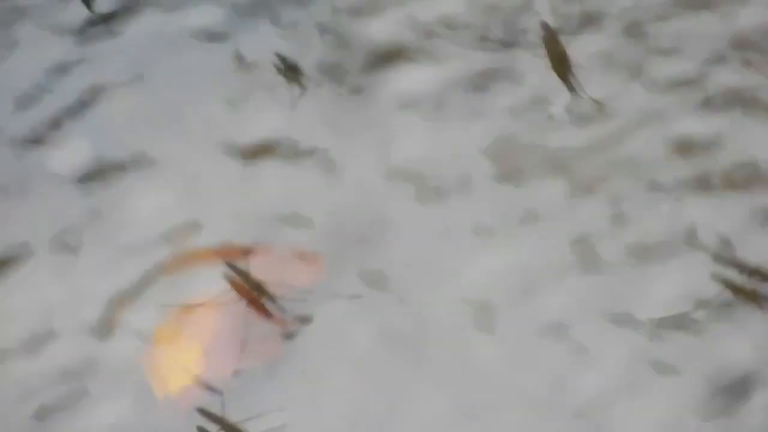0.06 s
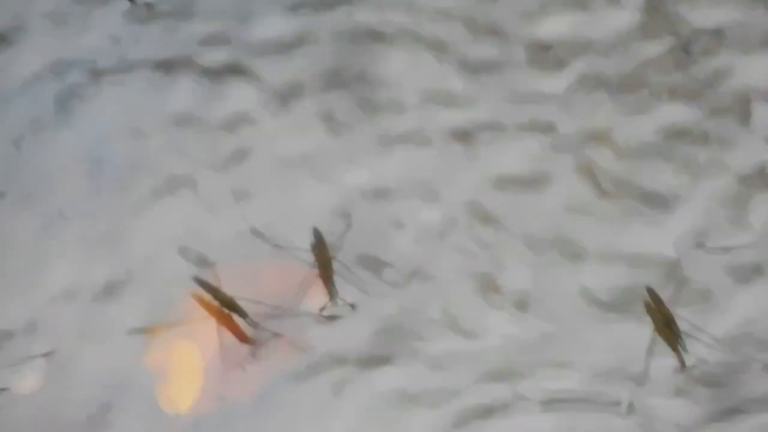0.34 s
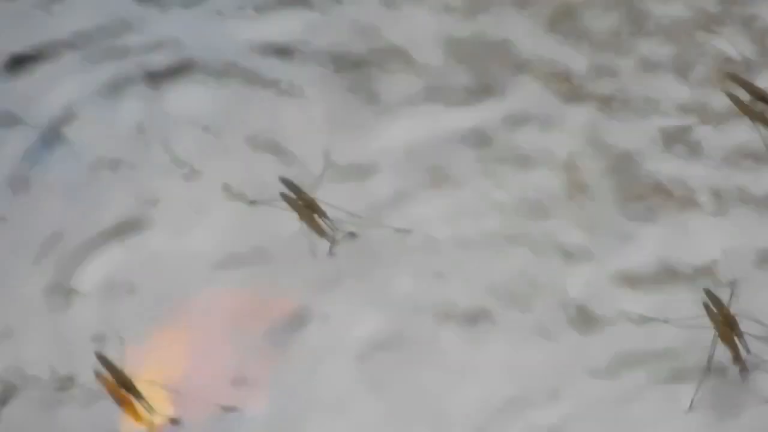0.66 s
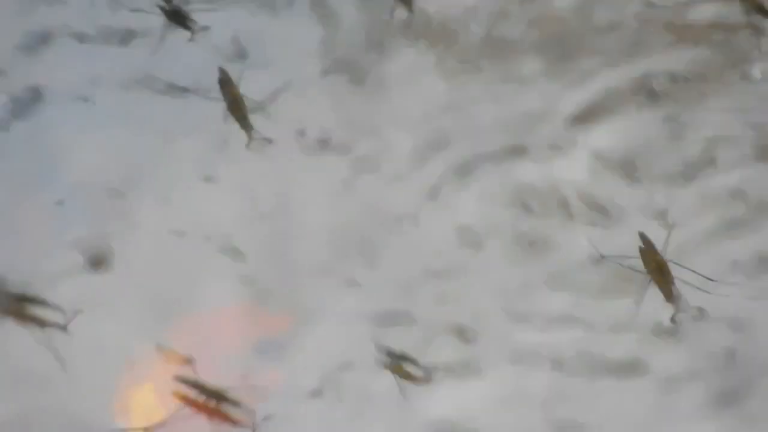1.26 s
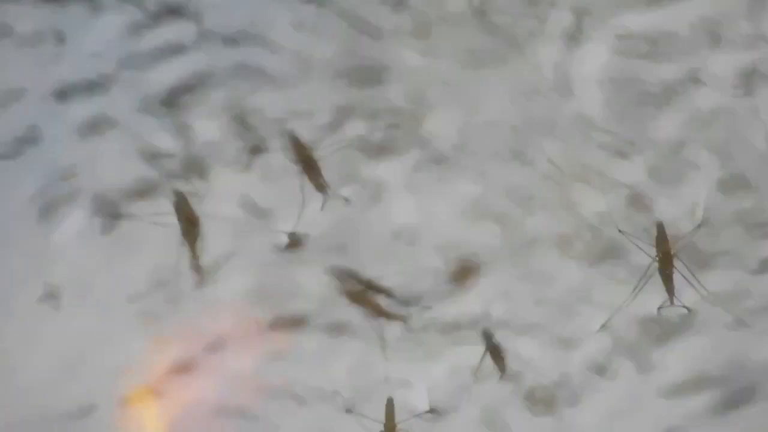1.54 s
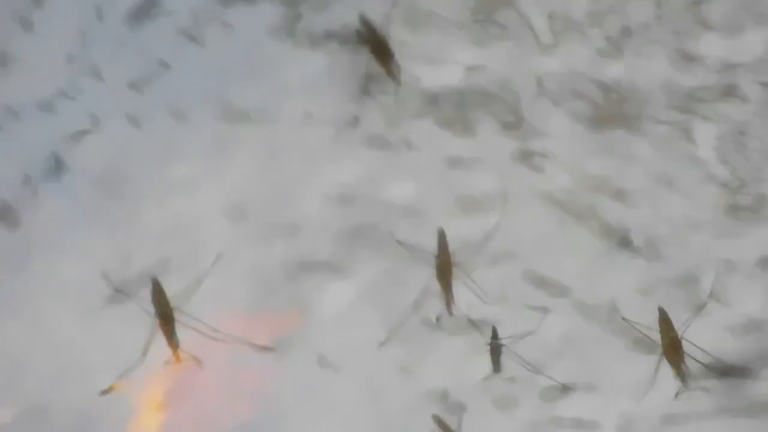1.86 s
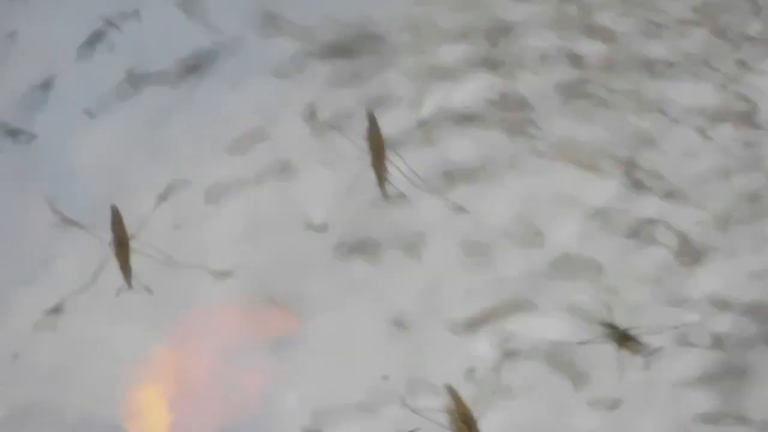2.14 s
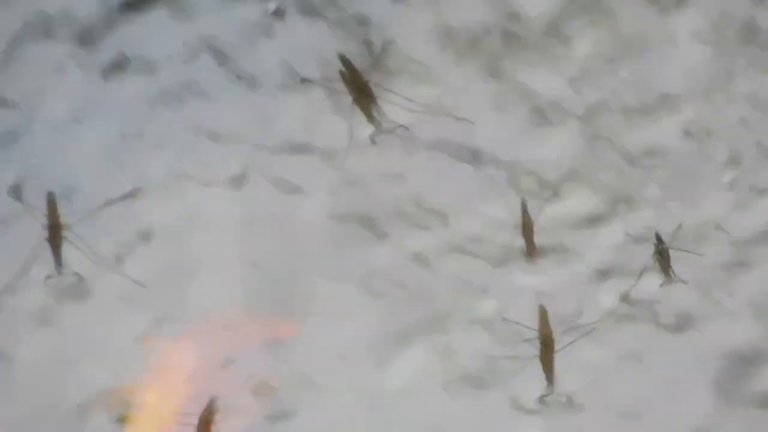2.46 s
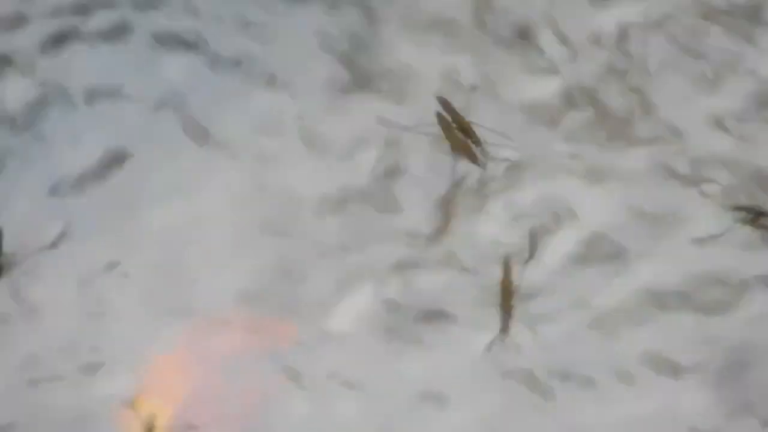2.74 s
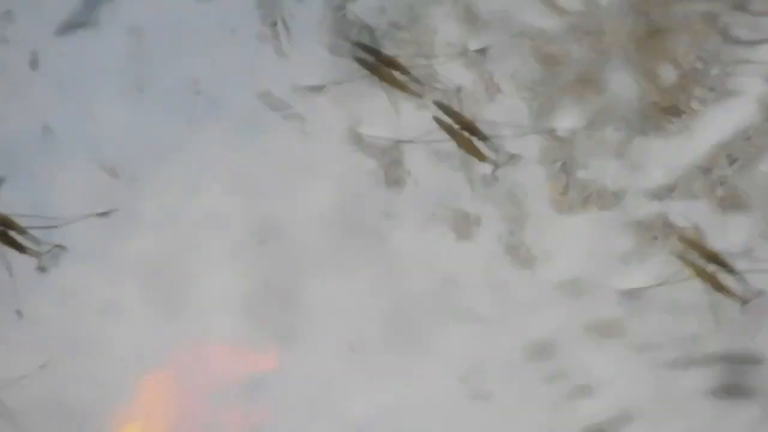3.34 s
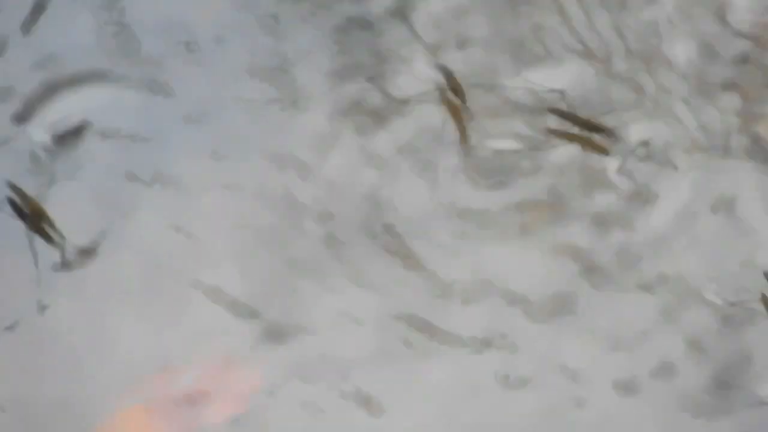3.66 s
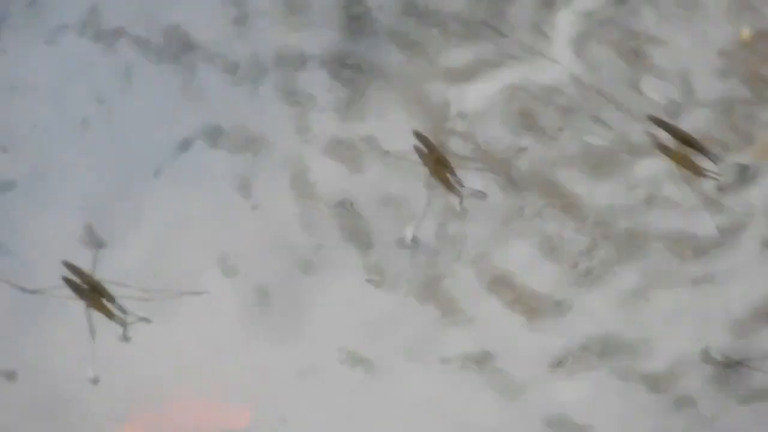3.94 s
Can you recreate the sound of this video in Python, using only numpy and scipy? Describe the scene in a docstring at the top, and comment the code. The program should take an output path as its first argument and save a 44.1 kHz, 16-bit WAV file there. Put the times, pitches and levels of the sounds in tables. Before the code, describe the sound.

A light breeze hisses through leaves beside a pond, swelling a little and then easing. Faint ticks and very brief distant chirps dot the middle, while air softly bumps the microphone, mostly at the start and end.

```python
"""Breeze beside a pond

A breeze swells and eases in the leaves, whose countless contacts add up to an even hiss with a
fine rustle in it. A few faint ticks, as of twigs or drops, stand out, with brief distant chirps.
Air nudges the microphone with soft bumps and a low flutter, and a steady far wash lies beneath.
Both channels carry the same sound."""
import sys
import numpy as np
from scipy import signal
from scipy.io import wavfile

SR = 44100
rng = np.random.default_rng(int(sys.argv[2]) if len(sys.argv) > 2 else 0)


def generate_wav(sig):
    """Save sig (samples, or channels by samples) to the path in sys.argv[1] as 16-bit PCM at SR."""
    pcm = np.round(np.clip(np.atleast_2d(sig).T, -1, 1) * 32767).astype(np.int16)
    wavfile.write(sys.argv[1], SR, pcm)


N = 176400
TIME = np.arange(N) / SR

# Strength of the breeze, heard in the leaves. Each row: time in seconds, level in dB.
BREEZE_LEVEL = [(0, -54), (.35, -54), (.8, -52), (1.25, -50.1), (1.5, -49.5), (1.83, -51), (1.95, -49.5),
                (2.15, -51), (2.8, -52), (3.4, -54), (4, -53.5)]
# Spectrum of the leaves. Each row: frequency in Hz, relative spectral density in dB.
LEAF_SPECTRUM = [(100, -43), (250, -11.5), (500, -7), (800, -1), (1100, -3), (1350, 0.5), (1700, 1),
                 (2400, 2), (3800, -2.5), (5600, -6.5), (7600, -14.5), (10500, -15), (13000, -24),
                 (15500, -27)]
# Small ticks. Each row: start in seconds, level in dB, centre in Hz, bandwidth in octaves,
# time to decay by 60 dB in seconds, tail level in dB relative to the crack.
TICK_EVENTS = [(.56, -57, 12500, 0.56, 0.064, -9.5), (1.205, -45, 3900, 0.69, 0.13, -9.5),
               (1.722, -29.5, 2600, 0.5, 0.0071, -18), (1.994, -44, 4500, 2.3, 0.053, -9.5),
               (2.5825, -49, 9300, .4, .012, -10), (2.5922, -34, 3750, 0.95, 0.013, -12),
               (2.9, -57, 10900, .6, 0.2, -9.5), (3.192, -38, 3000, 1.5, 0.018, -14),
               (3.4516, -31, 14200, .3, 0.003, -21), (3.4526, -37.5, 3300, 1.7, 0.0061, -7),
               (3.453, -44.5, 3700, .15, 0.065, -9)]
# Chirps, as of far birds or drips. Each row: midpoint in seconds, level in dB,
# pitch at the midpoint in Hz, glide in Hz per second, length in seconds.
CHIRP_EVENTS = [(1.633, -52.5, 1470, 3500, 0.092), (2.762, -50.5, 1380, 0, 0.039),
                (2.832, -55, 1330, 0, .045), (3.197, -49, 2104, -62000, .035)]
# Nudges of air on the microphone. Each row: midpoint in seconds, peak in dB, pitch in Hz,
# Gaussian width in cycles.
BUMP_EVENTS = [(0.0226, -43, 90, 0.13), (.0685, -50, 90, .3), (0.0864, -45, 150, 0.13),
               (0.0919, -44.5, 280, 0.23), (0.1008, -45, 149, 0.24), (0.108, -43, 260, 0.41),
               (0.2823, -42, 140, 0.15), (0.2859, -38.5, 283, 0.18), (0.3379, -54, 322, 0.5),
               (0.346, -56, 220, 0.31), (1.607, -59, 85, 0.52), (1.68, -59, 60, 0.61),
               (1.928, -48.5, 149, 0.28), (2.05, -61, 160, 0.29), (2.303, -48, 350, 0.69),
               (2.3123, -49, 193, 0.42), (2.4045, -46.5, 250, 0.44), (2.4355, -44.5, 310, 0.33),
               (2.443, -48, 120, .3), (2.474, -48.5, 248, 0.31), (2.547, -51, 190, 0.39),
               (3.41, -60, 64.7, .5), (3.794, -32, 475, 0.49), (3.8225, -45, 79, 0.2),
               (3.8402, -41.5, 215, 0.24), (3.873, -42.5, 260, 0.22), (3.9953, -33, 320, 0.24)]
# Strength of the air's flutter on the microphone. Each row: time in seconds, level in dB.
FLUTTER_LEVEL = [(0, -44), (.045, -64), (.095, -53.5), (.15, -70), (.25, -61), (.4, -68), (.7, -86),
                 (1.0, -82), (1.35, -74), (1.75, -71), (1.92, -68), (2.07, -65), (2.18, -71), (2.47, -60.5),
                 (2.8, -77), (3.2, -88), (3.4, -74), (3.55, -74), (3.76, -61), (3.84, -58), (4, -59)]
# Spectrum of the flutter. Each row: frequency in Hz, relative spectral density in dB.
FLUTTER_SPECTRUM = [(20, -0.5), (40, 0.5), (80, -2.5), (160, -6.5), (350, -14), (600, -34), (1200, -71)]
# Spectrum of the far wash. Each row: frequency in Hz, relative spectral density in dB.
WASH_SPECTRUM = [(30, -6.5), (120, -14), (300, -6), (600, 1), (900, 1), (1140, 3), (1400, 2), (1800, -4),
                 (3000, -16), (6000, -5.5), (8000, -15.5), (15500, -19.5)]


def leaves(hiss_db=0.13, rustle_db=-9, touches_per_s=250, spread_db=3, flicker_db=0.63):
    """Incoherent addition: far leaves merge to a hiss; near ones touch more often as the breeze rises."""
    breeze_db = in_time(BREEZE_LEVEL)
    hiss = from_db(hiss_db) * noise(LEAF_SPECTRUM, flicker_db)
    touch_rate = touches_per_s * from_db(breeze_db - breeze_db.mean())
    touches = rng.random((2, N)) < touch_rate / (2 * SR)   # two streams share the rate
    sizes = from_db(spread_db * np.minimum(rng.exponential(1, (2, N)), 4))
    signs = rng.choice([-1, 1], (2, N))
    rustle = from_db(rustle_db) * coloured(touches * sizes * signs, LEAF_SPECTRUM, flicker_db)
    return from_db(breeze_db) * (hiss + rustle)


def ticks(tail_t60_s=0.06):
    """Exponential decay: each narrow or broad crack dies away with a weak tail of scattered sound."""
    out, age = np.zeros(N), TIME[:SR // 4]
    for start, db, hz, octaves, t60, tail_db in TICK_EVENTS:
        envelope = from_db(-60 * age / t60) + from_db(tail_db - 60 * age / tail_t60_s)
        edge_ratio = 2 ** (octaves / 2)
        burst = band(rng.standard_normal(len(age)), hz / edge_ratio, hz * edge_ratio)
        crack = rms_one(burst) * envelope / 2
        out += from_db(db) * np.interp(TIME - start, age, crack, left=0, right=0)
    return out


def chirps(scatter_share=0.35, waver_hz=99):
    """Scattering: foliage blurs the amplitude and phase of tones that swell and fade, some gliding."""
    out = np.zeros(N)
    scatter = 1 + scatter_share * (drift(waver_hz) + 1j * drift(waver_hz))
    for middle, db, hz, glide, length in CHIRP_EVENTS:
        offset = TIME - middle
        swell = np.cos(np.pi * np.clip(offset / length, -.5, .5)) ** 2
        phase = 2 * np.pi * (hz + glide * offset / 2) * offset
        out += from_db(db) * swell * np.real(scatter * np.exp(1j * phase))
    return out


def air_on_microphone():
    """Pressure fluctuation: each nudge of air swings down and up about once, over an uneven flutter."""
    out = from_db(in_time(FLUTTER_LEVEL)) * noise(FLUTTER_SPECTRUM, flicker_db=2)
    for middle, db, hz, width in BUMP_EVENTS:
        cycles = (TIME - middle) * hz
        window = np.exp(-.5 * np.minimum(np.abs(cycles / width), 10) ** 2)
        swing = np.sin(2 * np.pi * cycles) * window
        out += from_db(db) * swing / np.abs(swing).max()
    return out


def far_wash(level_db=-57.5):
    """Stationary noise: a distant wash flickers slightly about a constant level."""
    return from_db(level_db) * noise(WASH_SPECTRUM, flicker_db=1.5)


def noise(spectrum, flicker_db):
    """Spectral shaping turns white noise into coloured noise of unit rms."""
    return coloured(rng.standard_normal((2, N)), spectrum, flicker_db)


def coloured(sources, spectrum, flicker_db):
    """Filter bank: two excitations feed alternate third-octave bands that flicker partly together."""
    edges = 20 * 2 ** (np.arange(31) / 3)
    out, common_drift = 0, drift(rate_hz=9.8)
    for k, (low, high) in enumerate(zip(edges, edges[1:])):
        flicker = 0.68 * common_drift + drift(rate_hz=19.6)
        level_db = at_hz(spectrum, np.sqrt(low * high)) + flicker_db * flicker
        out = out + from_db(level_db) * band(sources[k % 2], low, high)
    return rms_one(out)


def drift(rate_hz):
    """Low-pass filtering of noise gives slow random motion of unit rms."""
    step, settling = 40, 2000   # samples per control point; points for the filter to settle
    pole = np.exp(-2 * np.pi * rate_hz * step / SR)
    white = rng.standard_normal(N // step + settling + 2)
    slow = signal.lfilter([1], [1, -2 * pole, pole * pole], white)[settling:]
    return np.interp(np.arange(N) / step, np.arange(len(slow)), rms_one(slow))


def band(x, low, high):
    """A band-pass filter with gentle slopes, its edges in Hz."""
    sections = signal.butter(2, [low, min(high, .45 * SR)], "band", fs=SR, output="sos")
    return signal.sosfilt(sections, x + 1e-18)


def at_hz(spectrum, hz):
    """Interpolation of a spectrum on a logarithmic frequency axis."""
    freqs, levels = np.transpose(spectrum)
    return np.interp(np.log(hz), np.log(freqs), levels)


def in_time(rows):
    """Linear interpolation of a control curve at every sample."""
    return np.interp(TIME, *np.transpose(rows))


def from_db(db):
    """Amplitude grows tenfold for every 20 dB."""
    return 10 ** (np.asarray(db) / 20)


def rms_one(x):
    """Normalisation to unit rms."""
    return x / np.sqrt(np.mean(x ** 2) + 1e-20)


def scene():
    """Superposition: all pressures add at one microphone, which feeds both channels."""
    mono = leaves() + far_wash() + ticks() + chirps() + air_on_microphone()
    return np.array([mono, mono])


def record(dry, cutoff_hz=15730):
    """Band limiting: a steep low-pass filter removes the highest treble."""
    return signal.sosfilt(signal.ellip(12, .1, 70, cutoff_hz, fs=SR, output="sos"), dry)


dry = scene()
out = record(dry)
generate_wav(out)
```